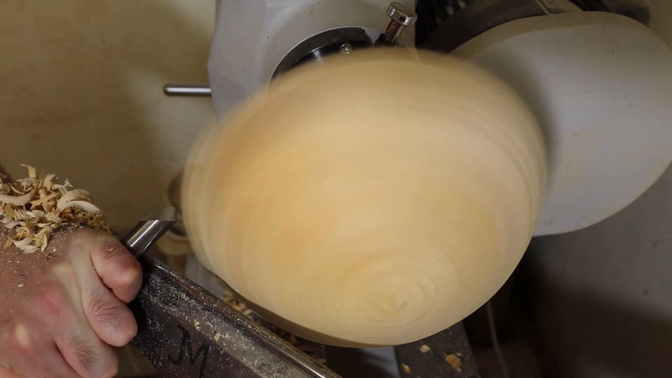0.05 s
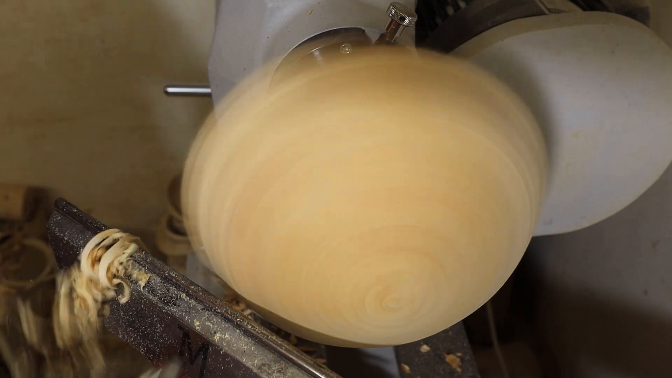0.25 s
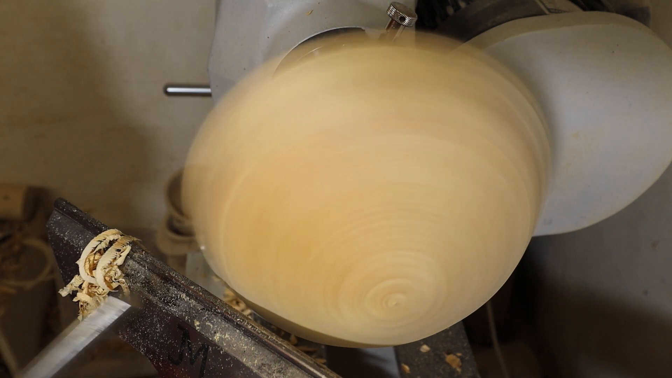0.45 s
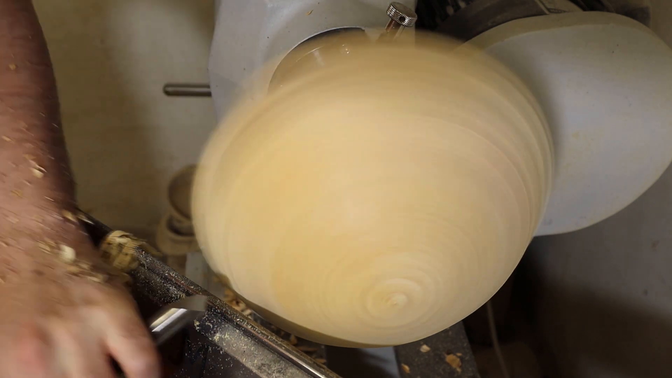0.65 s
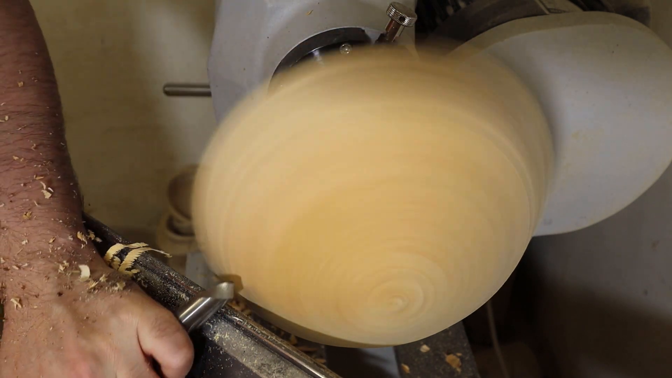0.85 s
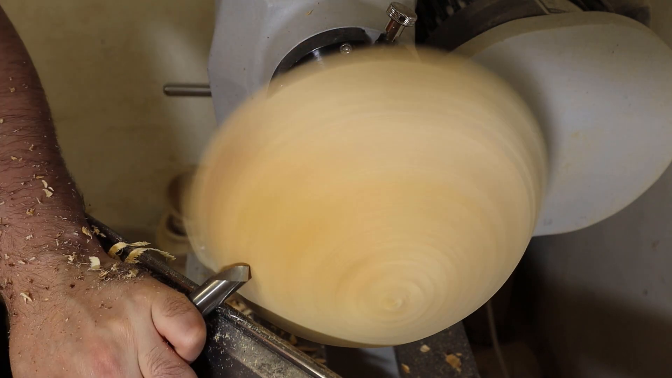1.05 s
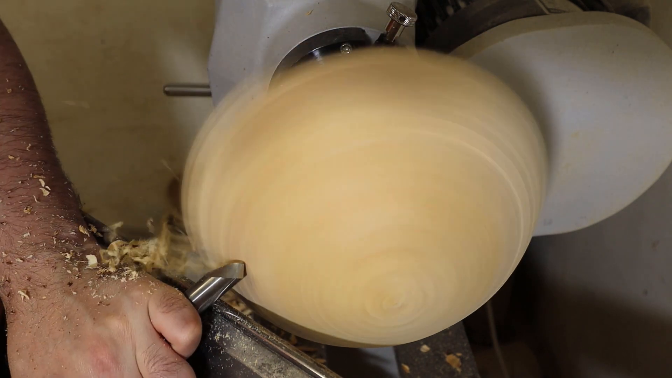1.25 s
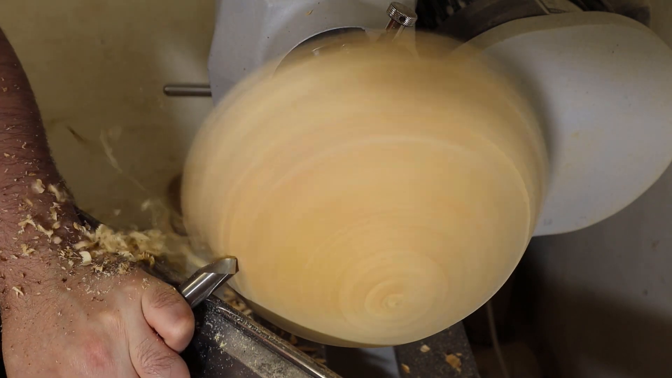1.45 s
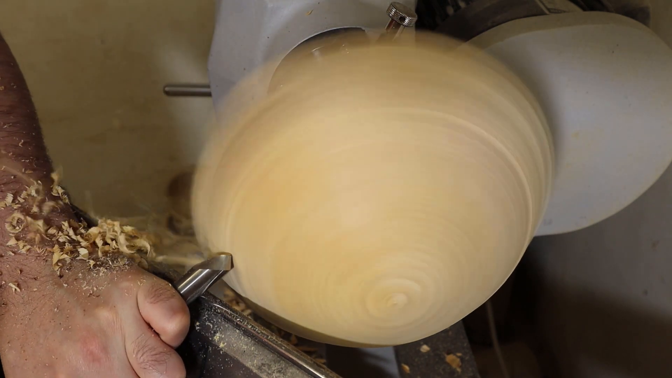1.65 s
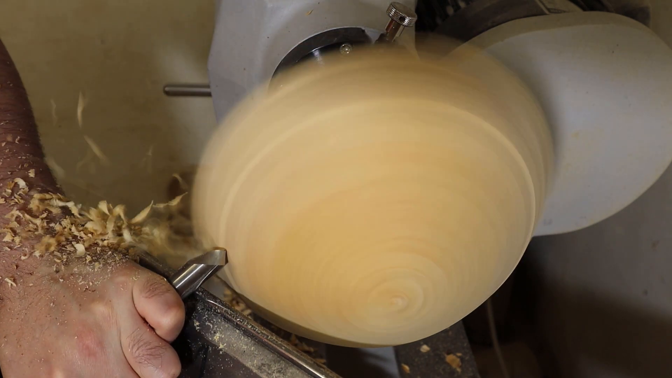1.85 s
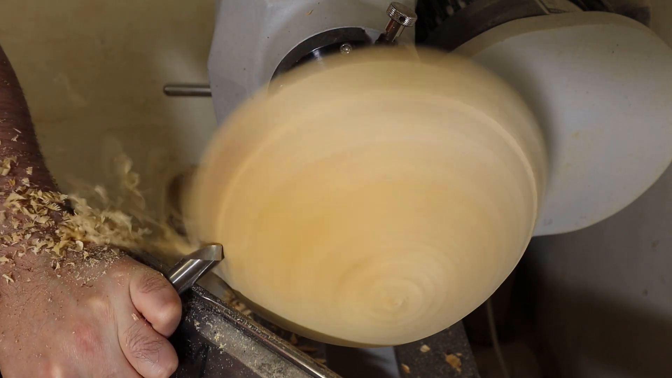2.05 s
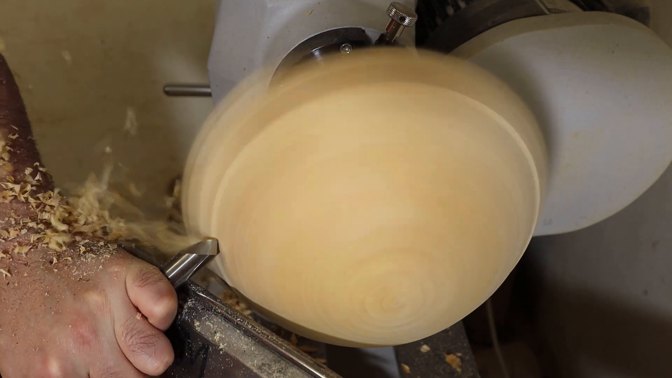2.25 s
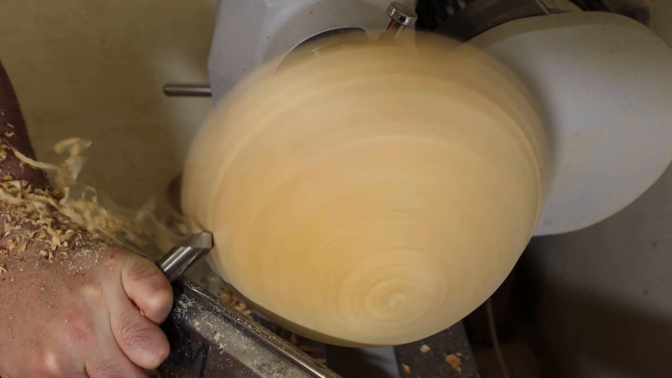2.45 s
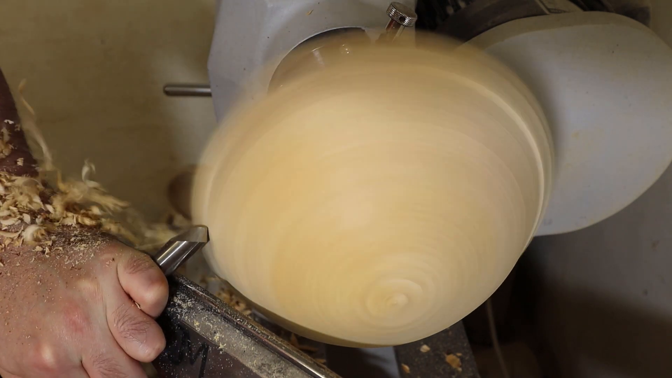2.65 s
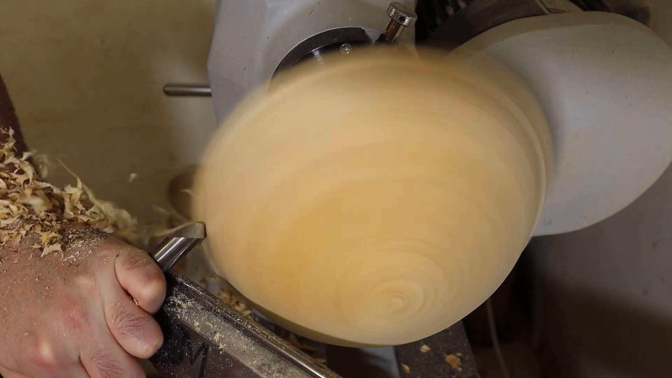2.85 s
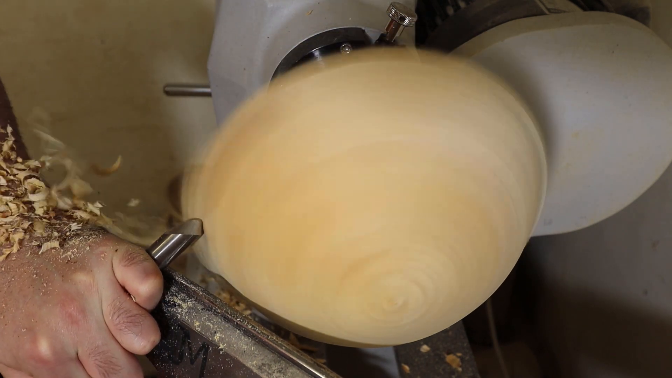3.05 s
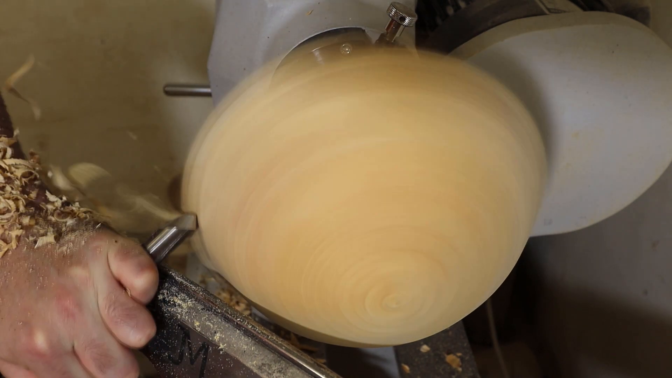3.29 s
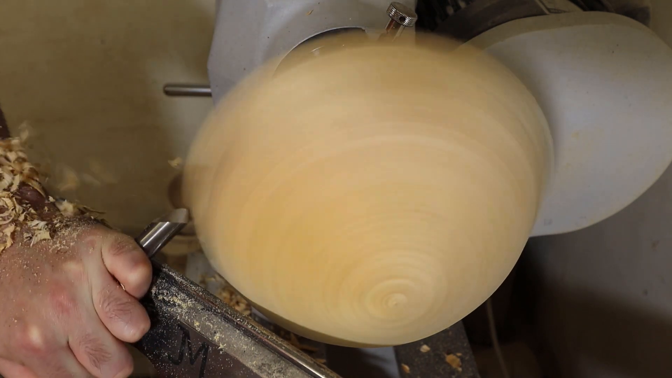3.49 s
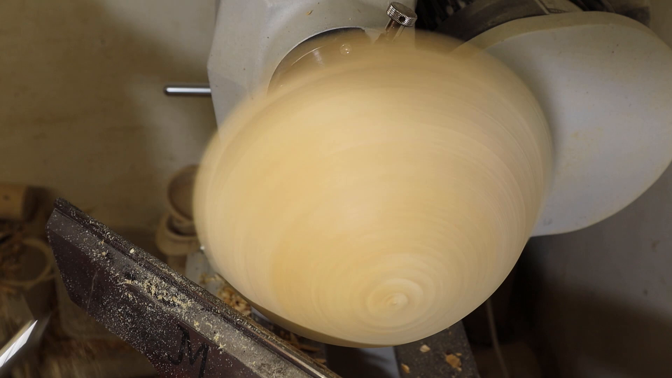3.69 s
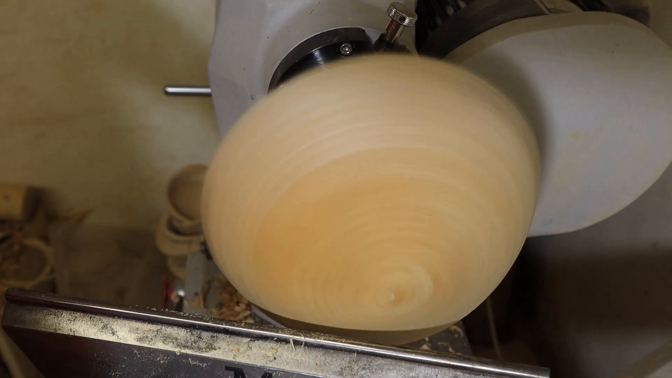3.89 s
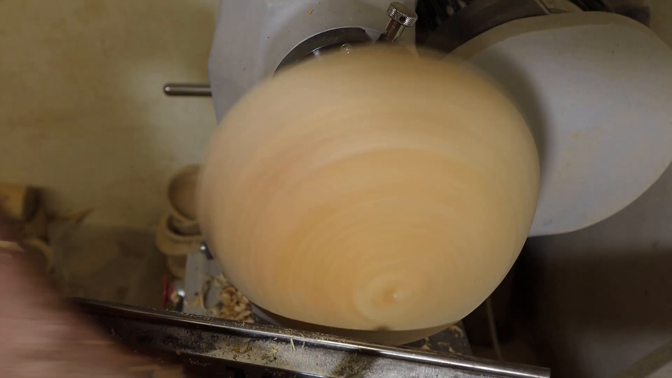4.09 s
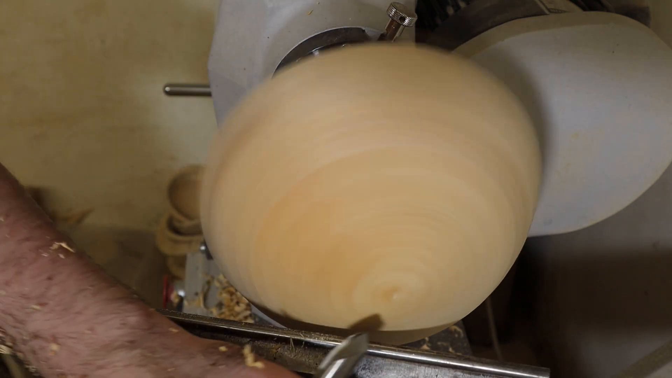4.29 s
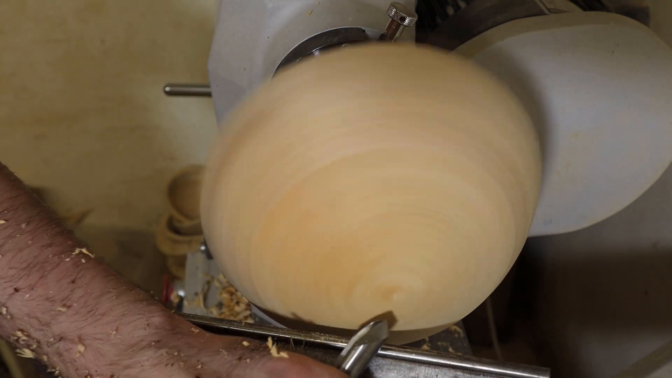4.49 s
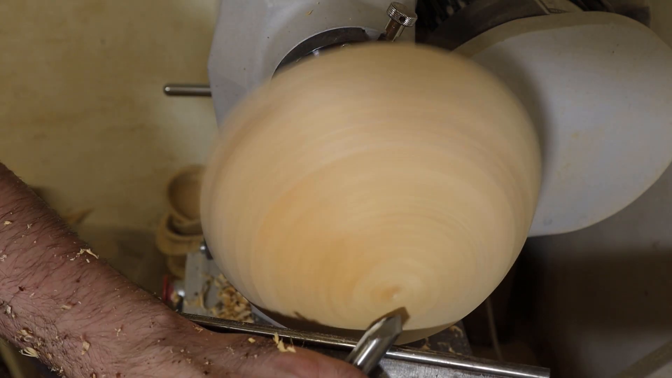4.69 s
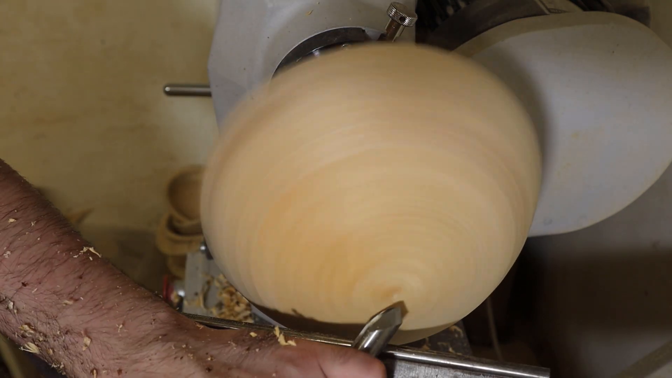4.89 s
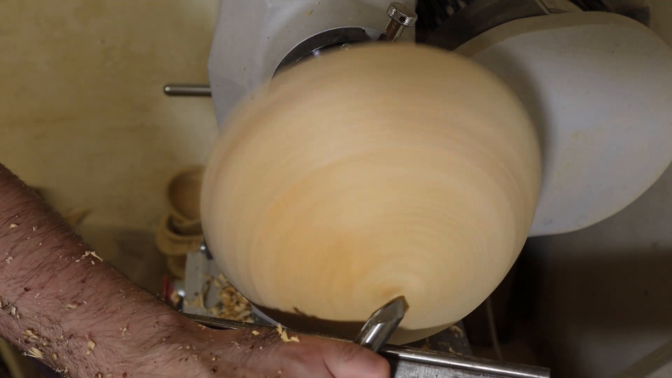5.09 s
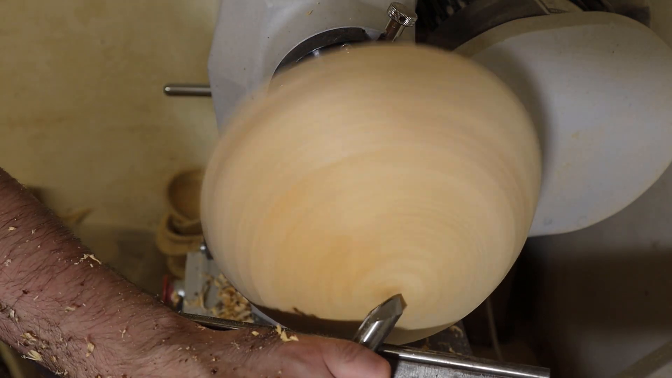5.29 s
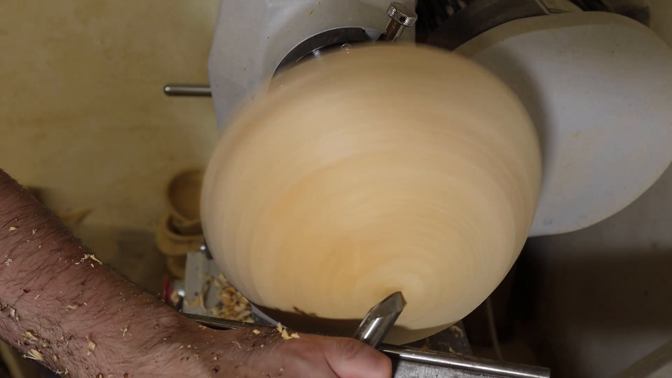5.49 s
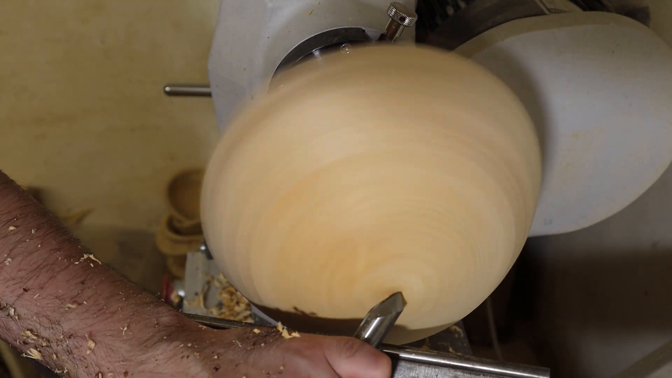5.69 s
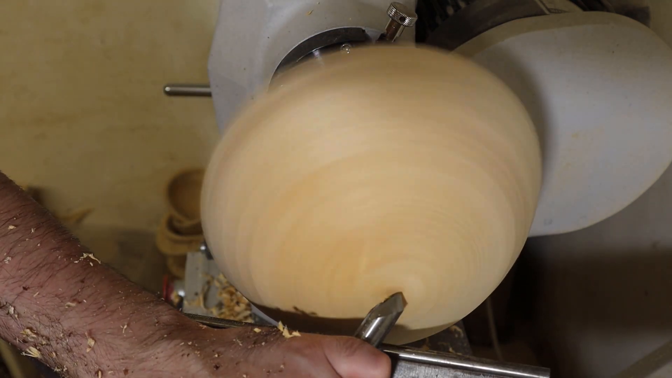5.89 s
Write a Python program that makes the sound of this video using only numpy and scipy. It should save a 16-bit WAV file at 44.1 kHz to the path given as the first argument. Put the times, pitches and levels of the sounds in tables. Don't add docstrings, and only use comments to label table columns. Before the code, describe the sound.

In a small workshop, heard close in stereo, a sharp, bright catch of steel on wood snaps at the very start and dies within a tenth of a second. A quiet belt drive idles underneath with soft knocking about eight times a second. Dry shavings rustle briefly between 0.2 and 0.7 s; a small metal clink falls at 0.85. After a light touch at 1.06, the gouge bites at 1.12: bright hissing, ringing steel and duller wood pulse about twenty-four times a second, swelling with hand pushes. It deepens toward 2.6, with harsh snags near 2.75 and 3.03, then breaks into rapid stuttering skips from 3.25 to 3.6. Idle returns briefly. At 3.89 the scene switches: a motor's hum climbs until about 4.45, then holds with low stand rumble, airy whirr and a thin steady whine near 10 kHz. The tool taps its rest at 4.73; faint shavings tick near the end.

```python
import sys
import numpy as np
from scipy import signal
from scipy.fft import rfft, irfft
from scipy.io import wavfile
from scipy.ndimage import uniform_filter1d

SR = 44100
rng = np.random.default_rng(int(sys.argv[2]) if len(sys.argv) > 2 else 0)


def undo_db(level):
    steps = np.asarray(level, float) / 20
    return 10 ** steps


def wav_out(sig):
    wavfile.write(sys.argv[1], SR, np.round(np.clip(np.atleast_2d(sig).T, -1, 1) * 32767).astype(np.int16))


N = 261954
TIME = np.arange(N) / SR
HZ = np.maximum(np.fft.rfftfreq(N, 1 / SR), 1)

TURN_HZ, BELT_HZ = 23.98, 7.96
MOVE_S = 3.885

# time_s, depth_db, unevenness_0_to_2
CUT = [
    (1.119, -52.5, 1.25),
    (1.3, -45, 1.2),
    (1.599, -44.5, 0.61),
    (1.9, -40.5, 0.92),
    (2.58, -38, .45),
    (2.8, -41.5, 1.2),
    (3.2, -40.5, 1.31),
    (3.29, -44.5, 1.2),
    (3.391, -47.5, 1.9),
]
# time_s, push_db
PUSHES = [
    (1.449, 9),
    (1.75, 5),
    (2.25, 2.5),
    (2.739, 2.5),
    (3.02, 1.5),
    (3.199, 1),
]
PUSH_HALF_S = 0.075
RING_PER_PUSH, HISS_PER_PUSH, THUD_PER_PUSH = 0.23, 0.78, 1.03
# angle_turns, width_turns, early_db, midway_db, late_db
RING_SPOTS = [(.15, .045, 6, 3, 7.5), (.40, .05, 4.5, 10, -0.5), (.64, .05, 3.5, 0, 3),
              (.90, 0.02, 9, -1, 4)]
# angle_turns, width_turns, early_db, midway_db, late_db
HISS_SPOTS = [(.14, .05, 3, 1.1, 6.5), (.28, 0.041, 3.5, 7.4, 6.6), (.55, .03, 5, 1, 8.9),
              (.76, .06, 4, 6, 3), (.92, 0.032, 3.4, 2, 1.03)]
HISS_AT_FULL_DB, HISS_TRIM_DB, HISS_PER_DEPTH, FULL_DEPTH_DB = -42.5, 0.35, 1.3, -40
WOOD_DB, WOOD_PER_DEPTH = -56, 0.28
WOOD_ENTRY_DB, WOOD_ENTRY_S, WOOD_AT_RIM_DB = -10, 0.17, 0
THUD_DB, THUD_LATE_DB, THUD_ANGLE_TURNS, THUD_SLIP_TURNS_PER_S = 1.5, 1.5, 0.86, -0.22
GRAZE_S, GRAZE_DB, GRAZE_FADE_DB_PER_S = 1.0645, -1.5, 150

# time_s, peak_db, hiss_rel_db, wood_rel_db
CATCHES = [(0.0204, -20.5, -12, -24), (0.0316, -35, -6, -9), (0.0623, -46.5, -7, -9),
           (1.1208, -40, -20, -34), (1.356, -41.5, -2, -5), (1.398, -41, -8, -13), (1.4385, -47, -5, -5),
           (1.481, -40, 2, -7), (2.722, -24, -8, -36), (2.7632, -28, -8, -20), (2.805, -24, -13.5, -25),
           (3.014, -27, -7, -17.5), (3.056, -33.5, -6, -21)]
CATCH_DIES_S = 0.019
# time_s, peak_db, hiss_rel_db, wood_rel_db, dying_s
EARLIER_TAIL = (-.004, -51, -8, -5.5, 0.093)
# middle_s, leading_db, middle_db, trailing_db, middle_hiss_rel_db
PASSES = [
    (3.2655, -29, -38, -36.5, -8),
    (3.3085, -27.5, -37.5, -30, -2.5),
    (3.3497, -34, -30.5, -29, -4),
    (3.3905, -37, -30.5, -27.5, -6),
    (3.4319, -70, -28.5, -33.5, 0),
    (3.4741, -70, -27.5, -31.5, -0.5),
    (3.5156, -72, -30, -32, 2.5),
    (3.5589, -70, -25.5, -35.5, -2),
    (3.6011, -69.5, -28.5, -38, -11),
]
RIDGE_LEAD_S, RIDGE_TRAIL_S = 0.01, 0.0097
# leading_s, middle_s, trailing_s
RIDGE_DIES_S = (0.022, 0.03, 0.041)
# first_hiss_rel_db, last_hiss_rel_db
OUTER_HISS_DB = (-13, -14)
# first_wood_rel_db, last_wood_rel_db
RIDGE_WOOD_DB = (-26, -15)

# pitch_hz, width_hz, level_db
GOUGE_MODES = [(3770, 51, -6), (4266, 162, 2.5), (4720, 77, -7), (4980, 240, -5.5), (6800, 79, -25),
               (7480, 110, 3)]
# pitch_hz, width_hz, level_db
SHANK_MODES = [(3790, 39, -14), (4310, 180, -1), (5580, 91, -2.5), (7360, 220, 4), (8360, 700, -16)]
# pitch_hz, width_hz, level_db
GOUGE_HIGH = [(8870, 390, -7), (9450, 210, 0), (10410, 190, -2), (12000, 32, -11), (11660, 100, -16.5),
              (13160, 130, -4), (12730, 120, -9)]
# pitch_hz, width_hz, level_db
WOOD_MODES = [(480, 25, -8), (633, 25.6, -3), (795.5, 43, 2.5), (961, 150, -4.5), (1118, 30, -6.5),
              (1360, 92, -3.5), (1990, 360, -13.5), (2680, 290, -5.5)]
# pitch_hz, density_db
RING_BED = [(1530, -50), (2600, -15.5), (3410, -10), (3680, -2), (4240, -3), (5470, -5.5), (7350, 3.5),
            (9000, -15), (11700, -40), (19800, -120)]
# pitch_hz, density_db
HISS_BED = [(4410, -33), (7500, -16), (8470, -16), (10500, 0), (15100, -0.5), (16200, -26), (16500, -45.5)]
# pitch_hz, density_db
WOOD_BED = [(60, -22.5), (300, -8.5), (500, -7.5), (1500, -10), (2800, -11), (3150, -19), (4200, -26)]

# time_s, drive_hz
DRIVE = [
    (3.885, 22.04),
    (4.1, 29.2),
    (4.38, 38.3),
    (4.45, 39.03),
    (5.94, 39.12),
]
# time_s, shake_db
SHAKE = [
    (3.885, -8.5),
    (4.15, -8),
    (4.45, -4),
    (4.8, -3),
    (5.2, -0.5),
    (5.6, -1),
    (5.94, -3.5),
]
RUMBLE_DB, FRAME_DB, FRAME_PER_SHAKE = -63.5, -64, 1.2
WHIRR_DB, WHIRR_DB_PER_DECADE = -68, 16
# pitch_hz, width_hz, level_db
RUMBLE_MODES = [(66, 10.3, -2), (89.4, 16, -3.5), (114, 21, -6.5), (151, 24, -12.5), (199, 12.4, -8.5)]
# pitch_hz, width_hz, level_db
FRAME_MODES = [(217, 11, -10.5), (283, 64, -7.5), (334, 22.5, -5.5)]
# pitch_hz, density_db
WHIRR = [(120, -45), (200, -19), (338, -5.5), (420, -17.5), (627, -9.5), (698, -8), (827, -23),
         (1270, -22.5), (1870, -23.5), (2360, -25.5), (2550, -27), (8000, -37.5), (10400, -49),
         (17600, -120)]
# pitch_hz, width_hz, rel_whirr_db, flutter_db
HOUSING = [(1000, 50, -15, 3), (1270, 90, -9, 3), (1440, 70, -9, 3), (1700, 80, -14, 3),
           (2380, 80, -17, 2.5), (2850, 120, -17, 4), (9950, 900, -15, 1)]
# drive_multiple, level_db
SLOT_TONE = [(18, -66), (37, -82), (61, -89)]
# pitch_hz, gain_db
SLOT_CASING = [(396, -19), (527, -12), (598, -.5), (634, -9), (686, 6), (701, 1.2)]
CARRIER_HZ, WHINE_DB = 10000.5, 5
# drive_multiple, level_db
WHINE = [(-13, -85), (-5, -90), (-3, -76), (-1, -84), (1, -81), (3, -81), (15, -90)]
SKIRT_DB, SKIRT_SCATTER_DB = -94, 6
# below_db, above_db
SKIRT_FALL_DB = (-0.1, 1.8)
# pitch_hz, side_minus_mid_db
RUN_SIDE = [(60, -26), (110, -22), (200, -15), (380, -13), (700, -2), (1290, -5), (2380, 1), (4400, 4.5),
            (8120, 6), (15000, 7)]

# time_s, rattle_s, peak_db
CLINK = (.848, 0.011, -38)
# pitch_hz, level_db, t60_s
CLINK_MODES = [(2073, -44, 0.11), (2870, -21, 0.048), (4151, -36, 0.38), (4840, -30, 0.066),
               (6300, -12, 0.011), (6627, -20, 0.043), (8950, -21, 0.031), (9900, -8.5, 0.036),
               (13400, -17, 0.018)]
# pitch_hz, density_db
CLINK_CRACK = [(880, -48), (1500, -18), (4370, -12), (6060, -4), (7540, -13), (9560, -4), (14900, -22),
               (16000, -38)]
# time_s, rattle_s, peak_db
TAP = (4.732, 0.005, -33.5)
# pitch_hz, level_db, t60_s
TAP_MODES = [(980, -17, 5.0), (1600, -20, 0.16), (1980, -3, 0.19), (2310, -5, 0.15), (2550, 1, 0.14),
             (3720, -8, 0.13), (4060, -8, 0.16), (4560, 5, 0.023), (7900, -17, 0.029), (8193, -21, 0.11),
             (8950, -55, 5.0)]
# pitch_hz, density_db
TAP_CRACK = [(800, -30), (1060, 3), (1300, -6), (2000, -2), (2900, -3), (3250, -8), (4300, -6), (5500, -21),
             (7800, -22), (11500, -28), (12500, -60)]
# (low_hz, high_hz), puffs of time_s, half_s, level_db
BRUSHES = [
    ((1900, 12000), [(.17, 0.018, -71.5), (.193, 0.0071, -64), (.358, 0.0086, -65), (.559, 0.026, -68.5), (.675, .016, -66)]),
    ((9000, 12800), [(4.25, .33, -83)]),
    ((630, 3400), [(3.948, 0.03, -67)]),
    ((2500, 4900), [(4.44, .012, -78), (5.25, .011, -83), (5.72, 0.024, -75), (5.803, .015, -69), (5.847, 0.0084, -72), (5.899, 0.012, -70)]),
]

BELT_DB = -65.5
# pitch_hz, density_db
BELT = [(40, -50), (130, -28), (190, -15), (278, -3), (400, -14), (461, -7), (560, -14), (620, -10),
        (700, -22), (940, -12), (1250, -23), (1640, -13), (1970, -19), (2600, -19), (3380, -43)]
# angle_turns, width_turns, level_db
BELT_KNOCKS = [(.83, .1, 5), (.44, .12, 2)]
# lap_multiple, level_db
BELT_ORDERS = [(110, -81), (116, -77), (118, -76), (120, -81), (124, -77), (128, -79), (136, -86)]
# pitch_hz, level_db
MOTOR_LINES = [(271, -79.5), (302, -78), (616, -82.5), (1657, -92.5), (1704.6, -76.5), (1752, -88),
               (1846, -89.5), (2374, -95)]
# pitch_hz, width_hz, level_db
BEARING = [(3770, 480, -79), (7080, 150, -85), (8600, 100, -88)]
# pitch_hz, density_db
SHOP_AIR = [(1180, -34), (2000, -6.5), (2850, -21), (3680, -5), (5620, -11), (8510, -16), (9890, -19),
            (15600, -16), (16500, -36)]
SHOP_AIR_DB = -74.5
# pitch_hz, side_minus_mid_db
SHOP_SIDE = [(60, -11), (110, -15), (200, -12), (380, -17), (700, -3.5), (1290, -2), (2380, -3.5),
             (4400, -1), (8120, 5), (15000, 5)]


def gouge():
    depth_db, unevenness = in_time(CUT)
    start_s, end_s = CUT[0][0], CUT[-1][0]
    push_db = sum(level_db * np.exp(-.5 * ((TIME - s) / PUSH_HALF_S) ** 2) for s, level_db in PUSHES)
    extra_depth_db = depth_db - FULL_DEPTH_DB

    ring_db = depth_db + RING_PER_PUSH * push_db
    hiss_db = HISS_AT_FULL_DB + HISS_TRIM_DB + HISS_PER_DEPTH * extra_depth_db + HISS_PER_PUSH * push_db
    load_db = np.interp(TIME, [start_s, start_s + WOOD_ENTRY_S, end_s - .15, end_s],
                        [WOOD_ENTRY_DB, 0, 0, WOOD_AT_RIM_DB])
    wood_db = WOOD_DB + WOOD_PER_DEPTH * extra_depth_db + push_db + load_db

    angle = THUD_ANGLE_TURNS + THUD_SLIP_TURNS_PER_S * (TIME - start_s)
    thud_db = THUD_DB + THUD_PER_PUSH * push_db + THUD_LATE_DB * (TIME - start_s) / (end_s - start_s)
    thud = undo_db(thud_db * (spot(TIME * TURN_HZ, angle, 0.12) - .5) + 1.63 * drift(30))

    touching = np.interp(TIME, [start_s - .005, start_s + 0.0055, end_s - .007, end_s], [0, 1, 1, 0])
    graze_db = GRAZE_DB - GRAZE_FADE_DB_PER_S * np.maximum(TIME - GRAZE_S, 0)
    touching += (TIME > GRAZE_S) * (TIME < start_s) * undo_db(graze_db)

    ring = undo_db(ring_db) * rim(RING_SPOTS, unevenness, 1.3) * touching
    struck = bites(column=1, trim_db=-2.5, attack_s=0.0007, linger=1.0)
    hiss = undo_db(hiss_db) * rim(HISS_SPOTS, unevenness, 1.6) * touching
    hiss = hiss + bites(column=2, trim_db=4.5, attack_s=0.00046, linger=1.0)
    wood = undo_db(wood_db) * thud * touching
    wood = wood + bites(column=3, trim_db=3.0, attack_s=0.0056, linger=2.15)
    ring_modes = GOUGE_MODES + [(4194, 21, 1.5)]
    return (cutting(ring, 0.35, ring_modes, RING_BED, 0.67, low_hz=3270, scatter_db=-8.0, left_db=-0.2)
            + cutting(struck, 0.11, SHANK_MODES, RING_BED, 0.62, low_hz=3300, scatter_db=-2.5, left_db=-0.5)
            + cutting(hiss, 0.057, GOUGE_HIGH, HISS_BED, 1.63, low_hz=7800, scatter_db=0.5, left_db=1.0)
            + cutting(wood, 0.72, WOOD_MODES, WOOD_BED, 0.28, low_hz=395, scatter_db=-6.5, left_db=0.5))


def cutting(force, memory, modes, bed, bed_share, low_hz, scatter_db, left_db):
    ringing = rfft(resonate(1. * (np.arange(N) == 0), modes))
    ringing = ringing / (1 + (low_hz / HZ) ** 8)
    broad = over_hz(bed, left=-200, right=-200)
    response = ringing / rms_of(ringing) + bed_share * broad / rms_of(broad)
    fibres = np.array([returning(TURN_HZ, memory) for part in range(3)])
    direct, *scattered = irfft(rfft(fibres * force) * response / rms_of(response), N)
    heard = place(direct, lead_samples=1.31, echo_db=-14.5, t60_s=0.16)
    heard = heard + undo_db(scatter_db) * np.array(scattered)
    return heard * undo_db(np.array([[left_db / 2], [-left_db / 2]]))


def rim(spots, unevenness, wander_db):
    level_db = wander_db * drift(71)
    for angle, width, *stages_db in spots:
        strength_db = np.interp(TIME, [1.1, 2.2, 3.3], stages_db) + 3.1 * drift(3.7)
        level_db = level_db + unevenness * strength_db * spot(TIME * TURN_HZ, angle, width)
    power = undo_db(level_db) ** 2
    return np.sqrt(power / uniform_filter1d(power, size=round(3 * SR / TURN_HZ)))


def bites(column, trim_db, attack_s, linger):
    force = np.zeros(N)
    for row in contacts():
        age_s = np.maximum(TIME - row[0], 0)
        peak_db = row[1] + (row[column] if column > 1 else 0) + trim_db
        force += undo_db(peak_db - 60 * age_s / row[4] / linger) * (1 - np.exp(-age_s / attack_s))
    return force


def contacts():
    rows = [EARLIER_TAIL] + [(*row, CATCH_DIES_S) for row in CATCHES]
    lead_dies_s, middle_dies_s, trail_dies_s = RIDGE_DIES_S
    span_s = [PASSES[0][0], PASSES[-1][0]]
    for s, lead_db, middle_db, trail_db, hiss_db in PASSES:
        outer_db = np.interp(s, span_s, OUTER_HISS_DB)
        wood_db = np.interp(s, span_s, RIDGE_WOOD_DB)
        rows += [(s - RIDGE_LEAD_S, lead_db, outer_db, wood_db, lead_dies_s),
                 (s, middle_db, hiss_db, wood_db, middle_dies_s),
                 (s + RIDGE_TRAIL_S, trail_db, outer_db, wood_db, trail_dies_s)]
    return rows


def run_up():
    (drive_hz,), (shake_db,) = in_time(DRIVE), in_time(SHAKE)
    cycles = np.cumsum(drive_hz) / SR
    frame_db = FRAME_DB + FRAME_PER_SHAKE * shake_db
    whirr_db = WHIRR_DB + WHIRR_DB_PER_DECADE * np.log10(drive_hz / drive_hz.max())
    noise = [stand(RUMBLE_DB + shake_db, frame_db) + whirr(whirr_db) for ear in "ms"]
    hum = np.sin(2 * np.pi * 334 * TIME + .5 * drift(4.6))
    hum = undo_db(frame_db + 4.0 + 2.6 * drift(8.2)) * hum
    whine = place(undo_db(WHINE_DB) * inverter(cycles), lead_samples=5.92, echo_db=-40, t60_s=.3)
    return wide(*noise, RUN_SIDE) + hum + slot_tone(drive_hz, cycles) + whine


def stand(rumble_db, frame_db):
    low_cut = signal.butter(10, 59, "high", fs=SR, output="sos")
    rumble = signal.sosfilt(low_cut, resonate(rng.standard_normal(N), RUMBLE_MODES))
    frame = resonate(resonate(rng.standard_normal(N), [(300, 210, 0)]), FRAME_MODES)
    return (undo_db(rumble_db + 1.0 * drift(5)) * rms_one(rumble)
            + undo_db(frame_db + 1.1 * drift(2.4)) * rms_one(frame))


def whirr(whirr_db):
    out = undo_db(whirr_db) * colour(rng.standard_normal(N), WHIRR)
    for hz, width_hz, level_db, flutter_db in HOUSING:
        band = resonate(resonate(rng.standard_normal(N), [(hz, width_hz, 0)]), [(hz, 2 * width_hz, 0)])
        out += undo_db(whirr_db + level_db + flutter_db * drift(8.8)) * rms_one(band)
    return out


def slot_tone(drive_hz, cycles):
    casing = undo_db(np.interp(SLOT_TONE[0][0] * drive_hz, *np.transpose(SLOT_CASING)))
    shaft = np.pi * cycles
    wobble = 1 + 0.12 * np.cos(shaft)
    tone = 0
    for k, level_db in SLOT_TONE:
        phase = 2 * k * shaft + 0.47 * np.sin(shaft) + 0.13 * drift(1.8)
        tone = tone + undo_db(level_db + 1.5 + 0.52 * drift(16)) * wobble * np.sin(phase)
    return casing * tone


def inverter(cycles):
    strong = dict(WHINE)
    skirt = []
    for k in range(-31, 30, 2):
        if k not in strong:
            fall_db = SKIRT_FALL_DB[k > 0] * abs(k)
            skirt.append((k, SKIRT_DB - fall_db + SKIRT_SCATTER_DB * rng.standard_normal()))
    out = 0
    for k, level_db in WHINE + skirt:
        turns = CARRIER_HZ * TIME + k * cycles + rng.random()
        out = out + undo_db(level_db + 3 + .8 * drift(10)) * np.sin(2 * np.pi * turns)
    return out


def tap(hit, modes, crack, ring_db):
    s, rattle_s, level_db = hit
    age_s = TIME - s
    clicks = rng.standard_normal(N) * (age_s >= 0) * np.exp(-(np.maximum(age_s, 0) / rattle_s) ** 2)
    ring = np.zeros(N)
    for hz, mode_db, t60_s in modes:
        r = undo_db(-60 / (min(t60_s, .045) * SR))
        w = 2 * np.pi * hz / SR
        poles = [1, -2 * r * np.cos(w), r * r]
        ring += undo_db(mode_db) * signal.lfilter([0, np.sin(w)], poles, clicks + 1e-18)
    broad = colour(clicks, crack)
    return undo_db(level_db) * (undo_db(ring_db) * ring / np.max(np.abs(ring)) + broad / np.max(np.abs(broad)))


def brushes():
    out = np.zeros((2, N))
    for (low_hz, high_hz), puffs in BRUSHES:
        force = sum(undo_db(level_db) * np.exp(-.5 * ((TIME - s) / half_s) ** 2) for s, half_s, level_db in puffs)
        band = signal.butter(2, [low_hz, high_hz], "band", fs=SR, output="sos")
        noise = signal.sosfilt(band, rng.standard_normal((2, N)))
        out += force * noise * np.sqrt(SR / 2 / (high_hz - low_hz))
    return out


def idle():
    belt = [undo_db(BELT_DB - 6.5) * colour(returning(2 * BELT_HZ, 0.7), BELT) for ear in "ms"]
    air = [undo_db(SHOP_AIR_DB) * colour(rng.standard_normal(N), SHOP_AIR) for ear in "ms"]
    whistles = 0
    for hz, width_hz, level_db in BEARING:
        whistle = rms_one(resonate(rng.standard_normal(N), [(hz, width_hz, 0)]))
        whistles = whistles + undo_db(level_db + 3.5 * drift(20)) * whistle
    tones = 0
    for hz, level_db in MOTOR_LINES:
        tone = np.sin(2 * np.pi * (hz * TIME + rng.random()))
        tones = tones + undo_db(level_db + 3.5 + 2.3 * drift(4.3)) * tone
    shade = undo_db(np.interp(TIME, [1.1, 3.6], [0, -5]))
    mid = belt[0] + air[0] + shade * (belt_guard() + tones) + whistles
    return wide(mid, belt[1] + air[1], SHOP_SIDE)


def belt_guard():
    knock_db = sum(level_db * spot(TIME * BELT_HZ, angle, width) for angle, width, level_db in BELT_KNOCKS)
    ringing = 0
    for k, level_db in BELT_ORDERS:
        order = np.cos(2 * np.pi * k * (TIME * BELT_HZ - .85))
        ringing = ringing + undo_db(level_db - 1 + 2.5 * drift(7)) * order
    lap = resonate(returning(2 * BELT_HZ, .95), [(984, 340, 0)])
    lap = rms_one(resonate(lap, [(973, 160, -3.5), (780, 115, 0.0)]))
    return undo_db(knock_db) * (ringing + undo_db(-75.0) * lap)


def place(x, lead_samples, echo_db, t60_s):
    s = TIME[:SR // 3]
    echo = rng.standard_normal((2, len(s))) * undo_db(-60 * s / t60_s) * (1 - np.exp(-s / 0.0011))
    echo = undo_db(echo_db) * echo / np.sqrt(np.sum(echo ** 2, 1, keepdims=True))
    shift = np.exp(1j * np.pi * HZ * lead_samples / SR * np.array([[1], [-1]]))
    return irfft(rfft(x) * shift, N) + signal.fftconvolve(x[None], echo)[:, :N]


def wide(mid, side, side_table):
    side = irfft(rfft(side) * over_hz(side_table), N)
    return np.array([mid + side, mid - side])


def returning(turn_hz, memory):
    size = round(SR / turn_hz)
    memory = np.clip(memory, 0, .97)
    fresh = rng.standard_normal((N // size + 31, size))
    turns = signal.lfilter([1], [1, -memory], fresh, axis=0)
    return rms_one(turns[30:].ravel()[:N])


def spot(turns, angle, width):
    return np.exp(-.5 * (((turns - angle + .5) % 1 - .5) / width) ** 2)


def drift(rate_hz):
    return rms_one(irfft(rfft(rng.standard_normal(N)) / (1 + (HZ / rate_hz) ** 2), N))


def resonate(x, peaks):
    out = 0
    for k, (hz, width_hz, level_db) in enumerate(peaks):
        r = np.exp(-np.pi * width_hz / SR)
        zeros = [(1 - r * r) / 2, 0, (r * r - 1) / 2]
        poles = [1, -2 * r * np.cos(2 * np.pi * hz / SR), r * r]
        out = out + (-1) ** k * undo_db(level_db) * signal.lfilter(zeros, poles, x)
    return out


def colour(x, spectrum):
    return rms_one(irfft(rfft(x) * over_hz(spectrum, left=-200, right=-200), N))


def over_hz(points, **ends):
    hz, level_db = np.transpose(points)
    return undo_db(np.interp(np.log(HZ), np.log(hz), level_db, **ends))


def in_time(rows):
    s, *columns = np.transpose(rows)
    return [np.interp(TIME, s, column) for column in columns]


def rms_one(x):
    return x / np.sqrt(np.mean(x ** 2) + 1e-20)


def rms_of(gain):
    return np.sqrt(np.mean(np.abs(gain) ** 2))


def scene():
    after = np.clip((TIME - MOVE_S) / 0.0098 + .5, 0, 1)
    clink = tap(CLINK, CLINK_MODES, CLINK_CRACK, ring_db=-3.5)
    clink = place(clink, lead_samples=0.99, echo_db=-10, t60_s=0.072)
    knock = tap(TAP, TAP_MODES, TAP_CRACK, ring_db=-18)
    knock = place(knock, lead_samples=3.7, echo_db=4.5, t60_s=0.12)
    return (gouge() + idle()) * (1 - after) + run_up() * after + brushes() + clink + knock


def roll_off(x):
    return signal.sosfilt(signal.butter(12, 17020, fs=SR, output="sos"), x)


def record(dry):
    return roll_off(dry)


dry = scene()
out = record(dry)
wav_out(out)
```